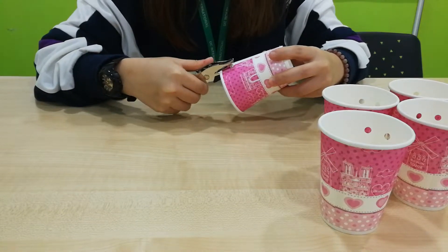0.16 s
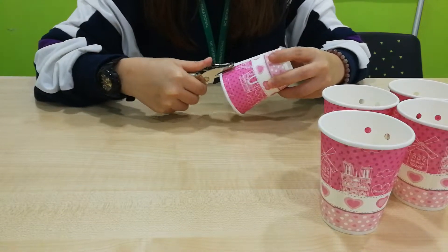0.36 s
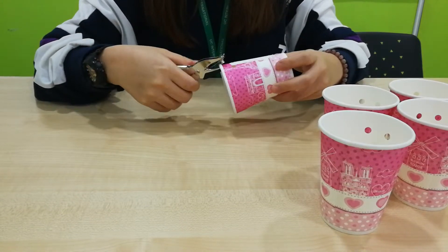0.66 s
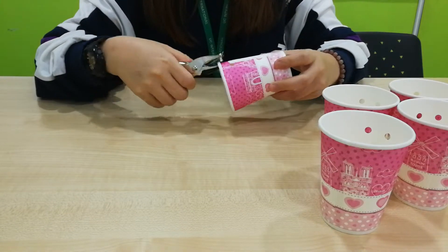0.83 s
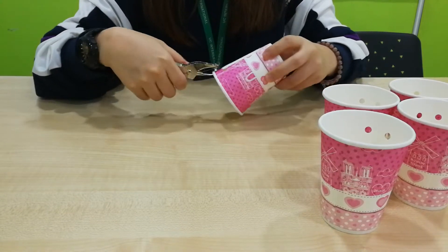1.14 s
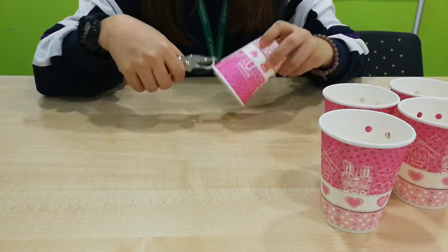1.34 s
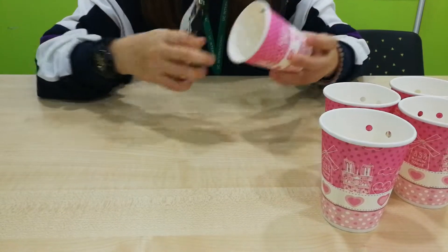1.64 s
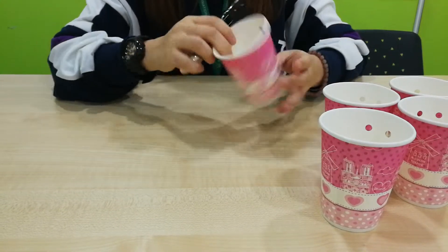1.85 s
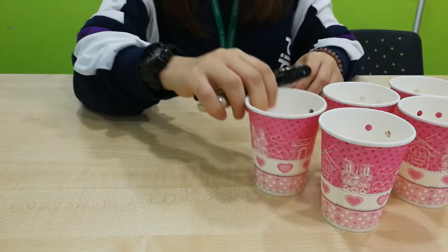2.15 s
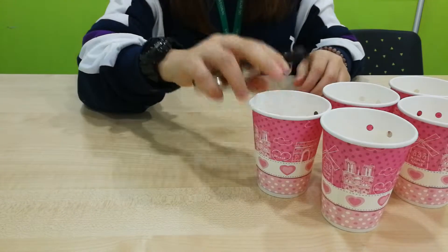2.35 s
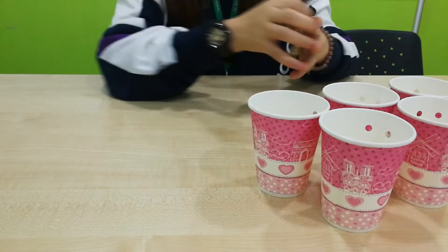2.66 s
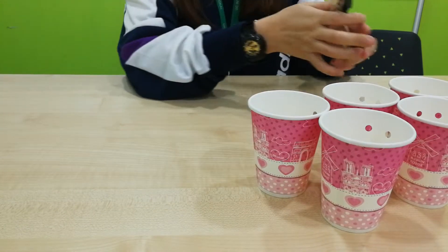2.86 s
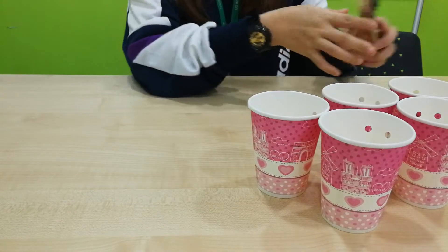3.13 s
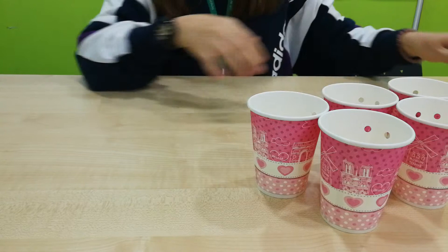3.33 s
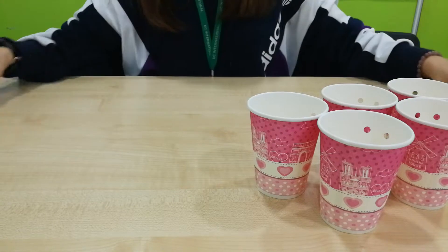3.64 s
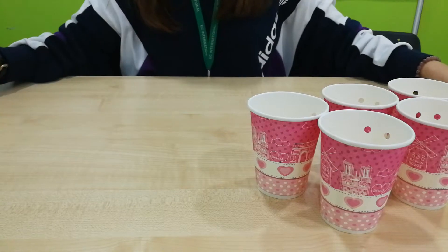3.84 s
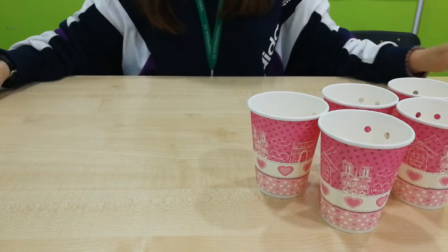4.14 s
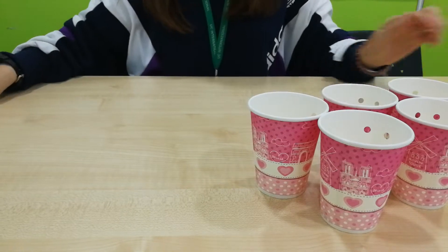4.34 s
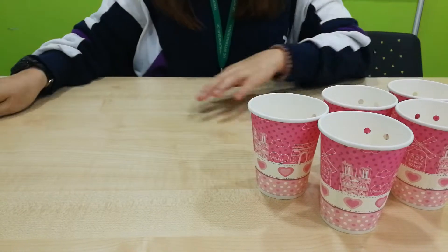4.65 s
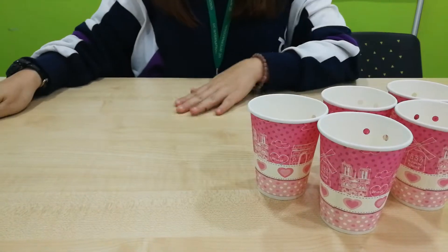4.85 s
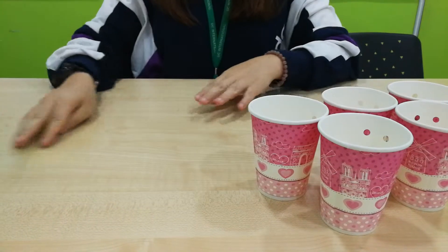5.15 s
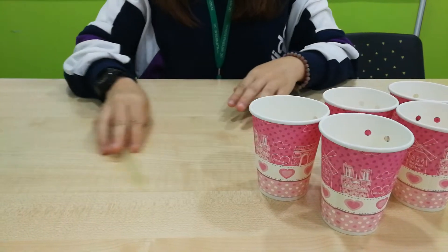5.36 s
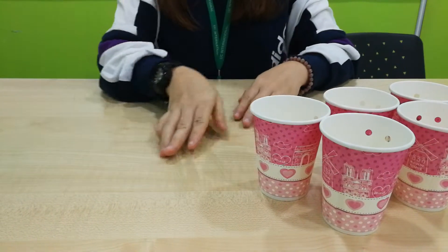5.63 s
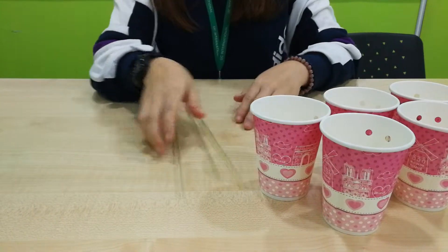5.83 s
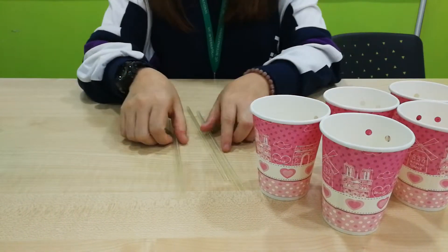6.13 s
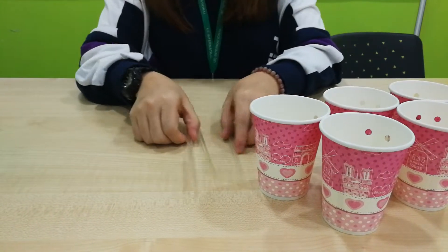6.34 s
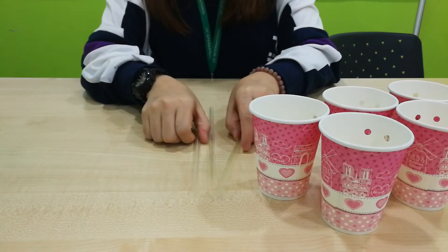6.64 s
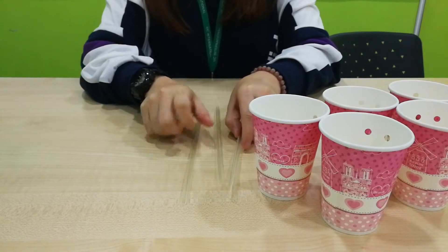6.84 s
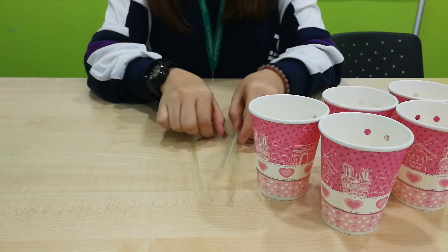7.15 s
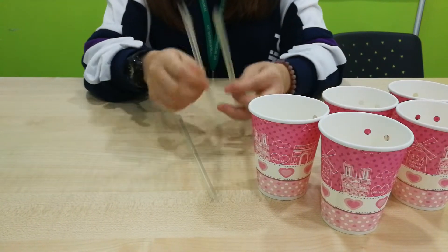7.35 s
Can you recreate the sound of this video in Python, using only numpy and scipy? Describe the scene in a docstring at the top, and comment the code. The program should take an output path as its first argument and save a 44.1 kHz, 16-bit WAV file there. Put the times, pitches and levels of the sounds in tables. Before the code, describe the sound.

A small hard-walled room, heard close from a phone with two microphones, with constant low air-conditioning rumble and soft hiss. Around 0.2 seconds faint metallic ticks lead to a loud, crisp hole-punch snap through a paper cup at 0.3, with smaller clicks and papery rubs at 0.5 to 0.7. Very faint cup taps and rubs follow from 1.0, ending in a clearer hollow tap at 1.8. At 2.2 the cup lands on the table with a firm, dull knock, and settles with a lighter one at 2.4. After a quiet gap, the punch is laid down at 3.7: two hard knocks almost together, the loudest moment, with a woody boom and short reverberation. From 4.2 light plastic straws click and scrape; the strongest swish comes at about 5.05, with smaller brushes until 5.8. Only faint touches and thin rustles remain up to 7.4.

```python
"""Two spaced phone microphones in a small hard room: a hand punch bites through a paper cup, close by.
The cup is tapped and set on a table, then the punch is laid down, jaws first and then handles.
Plastic straws are picked up, swept over the table top and nudged. Blows ring damped modes and slides
are dense stick-slip ticks; the room, an echo and a noise tail, answers both.
Throughout, air conditioning rumbles and hisses behind as shaped noise."""
import sys
import numpy as np
from scipy import signal
from scipy.fft import rfft, irfft, next_fast_len
from scipy.io import wavfile
from scipy.ndimage import uniform_filter1d

SR = 44100
rng = np.random.default_rng(int(sys.argv[2]) if len(sys.argv) > 2 else 0)


def unload_audio(sound):
    """Save the sound as a 16-bit wav file, at the path given as the first command line argument."""
    columns = np.transpose(np.atleast_2d(sound))
    # keep every value between -1 and 1, then stretch to whole-number steps
    steps = np.round(np.clip(columns, -1, 1) * 32767)
    wavfile.write(sys.argv[1], SR, steps.astype(np.int16))


N = 330309  # samples in the scene
SPAN = next_fast_len(N, True)  # samples of noise shaped at once

# Resonances of the punch in the cup and of the straws. Each row: centre in Hz, width in Hz, level in dB.
PUNCH_MODES = [(669, 80, 6), (1070, 97, 2.5), (1250, 450, -5), (2275, 290, -6), (2724, 390, 0),
               (4220, 1160, -6.5), (5140, 730, -12), (6870, 1240, -10.5), (9000, 1700, -18.5),
               (12400, 2700, -24)]
STRAW_MODES = [(1544, 600, -7.5), (2290, 360, -7.5), (2900, 720, -3.5), (3680, 390, -6.5), (4390, 800, -3),
               (5360, 2200, -11), (7800, 6200, -17.5), (11700, 4600, -20.5), (14100, 2700, -26)]
# Where a blow's colour is set, for punch and cup: low, reference, upper middle and high frequency in Hz.
CUP_BANDS = (560, 1000, 2800, 6000)


def punch_bites():
    """The punch bites through the cup: short hard contacts ring its resonances."""
    # Each row: start in seconds, peak in dB before the phone's colour, lows in dB, highs in dB, contact in ms.
    bites = [(.175, -31, -2, 15, 6.4), (.1795, -18, -3, 11.5, 5), (.185, -20.5, 5, 11, 4.1),
             (.2778, -2.5, -4, 1.5, 2.35), (.4965, -20, 7, 9, 3.4), (.589, -23, 1.5, -9.5, 7.1)]
    return blows(bites, PUNCH_MODES, CUP_BANDS, "hands", pan_db=0.0, room_db=10.5, mids_share=0.73)


def cup_taps():
    """Taps on the cup ring the resonances of its paper wall."""
    # Each row: start in seconds, peak in dB before the phone's colour, lows in dB, highs in dB, contact in ms.
    taps = [(.4845, -20, -14.5, 4.5, 2.9), (.572, -31.5, -1, -3, 3), (.6676, -19, -22, -9.5, 0.73),
            (1.0665, -37.5, -7, -14.5, 2.5), (1.281, -41, 6, 9, 1.6), (1.442, -34, -13, -11, 8.2),
            (1.464, -31, -7, 11, 3.4), (1.6566, -37, -7, 26, 1.3), (1.7005, -40.5, 6, 10, 6.6),
            (1.7744, -27.5, 4, 18.5, 10), (1.8045, -11.5, 9, 2.5, 3.2), (1.923, -33, -11, 7, 2.7)]
    # Each row: centre in Hz, width in Hz, level in dB.
    cup_modes = [(251, 98, -8), (382, 140, -5.5), (519, 137, 1), (729, 72, 5.5), (1111, 130, 3.5),
                 (1270, 150, -4.5), (1790, 210, -12), (2800, 1100, -16.5), (4500, 400, -15),
                 (6860, 2200, -22)]
    return blows(taps, cup_modes, CUP_BANDS, "hands", pan_db=1.5, room_db=10.0, mids_share=0.68)


def cup_set_down():
    """The cup lands on the table, whose top rings with a dull treble."""
    # Each row: start in seconds, peak in dB before the phone's colour, lows in dB, highs in dB, contact in ms.
    landings = [(2.2222, -7.5, -2.5, -3.5, 1.44), (2.238, -16, -4, -1, 2.8), (2.41, -36, -12, 19, 1.3),
                (2.4336, -16.5, -10.5, -6, 3.4)]
    # Each row: centre in Hz, width in Hz, level in dB.
    table_modes = [(560, 140, -9.5), (770, 130, -8), (1057, 114, -0.5), (1340, 220, -2), (1840, 280, -8),
                   (2610, 870, -8.5), (4300, 1100, -19.5), (6650, 910, -22.5), (8200, 2700, -26)]
    return blows(landings, table_modes, CUP_BANDS, "cups",
                 pan_db=0.0, room_db=9.0, mids_share=0.42, top_db=-11)


def punch_laid_down():
    """Jaws, then handles, strike the table; the handles set the whole table top booming."""
    # Each row: start in seconds, peak in dB before the phone's colour, lows in dB, highs in dB, contact in ms.
    touches = [(3.7306, -3, -15, -5.5, 7.6), (3.7553, -2.5, 0.9, 0, 2.3)]
    # Each row: centre in Hz, width in Hz, level in dB.
    tool_modes = [(197, 230, -5.5), (374, 550, -6.5), (1120, 1220, 5), (1800, 380, 4), (2640, 330, 2.5),
                  (3160, 720, 0.5), (4460, 920, -6), (6140, 720, -39), (8060, 410, -20)]
    # Low, reference, upper middle and high frequency in Hz.
    tool_bands = (704, 1520, 3200, 5500)
    jaws, handles = [
        blows([touch], tool_modes, tool_bands, "hands",
              pan_db=-2.5, room_db=room_db, mids_share=-1.5, top_db=-5)
        for touch, room_db in zip(touches, (9.5, 18.0))]
    return jaws + handles


def straw_clicks():
    """Light plastic straws click as contacts ring their high resonances."""
    # Each row: start in seconds, peak in dB before the phone's colour, lows in dB, highs in dB, contact in ms.
    clicks = [(4.2068, -32, -2, 8, 3.3), (4.3869, -37, -16, 1.5, 1.5), (4.4493, -29.5, -5.5, -2, 2.9),
              (4.6683, -18.5, 3, -14, 1.36), (4.7546, -17, 5.5, 5, 4.6), (4.7385, -33, 0, 3, 1.5),
              (4.8673, -34, -9, -5, 1.4), (5.1696, -26, -1, 15, 5.2), (5.2544, -27, 8, 8, 2.2),
              (5.5228, -28.5, 14, 0, 3.1), (5.7543, -29, 2, -2, 4.2), (5.7853, -33.5, 5, 0, 3.5),
              (6.2861, -38, 0, -11, 2.3), (6.8518, -26.5, 0, -5, 3.1), (7.1402, -36.5, -7, -2, 1.5),
              (7.201, -39, -8, 9, 1.6), (7.4011, -42, -7, 2, .9)]
    # Low, reference, upper middle and high frequency in Hz.
    straw_bands = (2410, 3100, 4530, 9000)
    return blows(clicks, STRAW_MODES, straw_bands, "straws", pan_db=-4.0, room_db=9.5, mids_share=.4)


def paper_rubs():
    """Paper slides by stick and slip, ringing the punch's resonances."""
    # Each row: firmest pressure in seconds, swell and fade over 20 dB in seconds, level of the lows in dB,
    # highs against lows in dB, left minus right in dB.
    strokes = [(.512, .015, 0.066, -44, -17, 8), (.586, 0.035, 0.047, -46.5, -12, 12),
               (1.46, 0.043, .08, -46.5, -12.5, 1.5), (1.71, 0.03, 0.2, -49.5, -21, 4),
               (1.808, .03, 0.1, -41, -15.5, 2)]
    return rub(strokes, PUNCH_MODES, slips_hz=6270, spread_db=2.5, flicker_db=2.0, low_hz=1430)


def straw_sweeps():
    """Straws sweep over the table top by stick and slip, ringing their own resonances."""
    # Each row: firmest pressure in seconds, swell and fade over 20 dB in seconds, level of the lows in dB,
    # highs against lows in dB, left minus right in dB.
    strokes = [(4.23, .03, 0.17, -51, -8, 3), (4.44, 0.12, .15, -53, -16, 1.2),
               (4.566, 0.064, 0.072, -45, -8.5, 1.5), (4.69, 0.068, 0.065, -46, -8.5, 3),
               (4.79, 0.059, 0.047, -44, -7, 0), (5.052, 0.076, .2, -32.5, -9, -1),
               (5.19, 0.068, 0.067, -48, -7, 5), (5.255, 0.029, .08, -47, -4, -.6),
               (5.33, .12, 0.15, -45.5, -9.5, .4), (5.44, 0.13, 0.12, -43, -11, 1),
               (5.52, 0.071, 0.12, -47, -6, 6.5), (5.66, 0.028, 0.054, -57, -11, -2),
               (6.14, 0.11, .2, -61, -20, -2), (6.32, 0.089, .2, -58, -9, 2),
               (6.41, 0.21, 0.14, -56.5, -4, 3), (6.48, 0.13, 0.04, -62.5, -6, 3),
               (7.12, .1, 0.13, -55, -11, 2), (7.2, .05, .3, -63.5, -7, 6),
               (7.405, .02, 0.088, -56.5, -9, 1.2)]
    return rub(strokes, STRAW_MODES, slips_hz=5930, spread_db=0.6, flicker_db=3.0, low_hz=1890)


def blows(events, modes, bands_hz, place, pan_db, room_db, mids_share, top_db=0, size=4096):
    """A sharp touch and ragged contact ring the modes: left, right, and what the walls hear per side."""
    # For each place, the samples by which the left microphone hears it first.
    left_lead = {"hands": 27, "cups": 6, "straws": 22}
    out = np.zeros((4, N + 2 * size))
    t = np.arange(size) / SR
    hz = np.fft.rfftfreq(size, 1 / SR)
    # heavy things stay in touch longer and lose the top
    ring = body(hz, modes) * undb(along(hz, [(8000, 0), (13000, top_db)]))
    sides_db = np.array([[pan_db], [-pan_db]]) / 2
    for s, peak_db, low_db, high_db, ms in events:
        contact = rng.standard_normal((3, size)) * np.exp(-t / (max(ms, .1) / 1000))
        # each microphone sees the thing from another side
        contact[1] = .8 * contact[0] + .6 * contact[1]
        # the walls hear all sides at once, which evens the raggedness out
        contact[2, 1:] = 0
        contact[:, 0] = 2.7  # the sharp first touch
        colour_db = (low_db, 0, mids_share * high_db, high_db)
        colour = undb(along(hz, list(zip(bands_hz, colour_db))))
        hit = irfft(rfft(contact) * causal(ring * colour))
        hit[:2] *= undb(peak_db + sides_db) / np.abs(hit[:2]).max(axis=1, keepdims=True)
        hit[2] *= undb(peak_db + room_db) / np.sqrt(np.sum(hit[2] ** 2))
        i = int(s * SR)
        out[0, i:i + size] += hit[0]
        out[1, i:i + size] += np.roll(hit[1], left_lead[place])
        out[2:, i:i + size] += hit[2] * undb(0.32 * sides_db)  # the walls hear less of the pan
    return out[:, :N]


def rub(strokes, modes, slips_hz, spread_db, flicker_db, low_hz):
    """Dense uneven stick-slip ticks ring the modes, with a finer scratch on top; strokes swell and fade."""
    t = np.arange(N) / SR
    hz = np.fft.rfftfreq(SPAN, 1 / SR)
    slips = rng.random((2, SPAN)) < slips_hz / SR
    ticks = slips * rng.standard_normal((2, SPAN))
    ticks = ticks * undb(spread_db * rng.exponential(size=(2, SPAN)))
    # light contact barely moves the low modes
    light_touch = 1 / (1 + (low_hz / np.maximum(hz, 1)) ** 4)
    spectrum = rfft(ticks) * body(hz, modes) * light_touch
    scratch_share = 1 / (1 + (7000 / np.maximum(hz, 1)) ** 6)
    lows = unit(irfft(spectrum * (1 - scratch_share), SPAN)[:, :N])
    highs = unit(irfft(spectrum * scratch_share, SPAN)[:, :N])
    lows = lows * undb(flicker_db * walk(45))
    highs = highs * undb(flicker_db * walk(45))
    out = np.zeros((2, N))
    for s, swell_s, fade_s, level_db, high_db, pan_db in strokes:
        pressure = undb(-20 * np.maximum((s - t) / max(swell_s, .005), (t - s) / max(fade_s, .005)))
        sides_db = np.array([[pan_db], [-pan_db]]) / 2
        out += pressure * undb(level_db + sides_db) * (lows + undb(high_db) * highs)
    return np.vstack([out, undb(-6.5) * out])  # the walls' share is weaker


def room(send):
    """A smeared echo from the near wall and a diffuse tail, short at the very top, that steepens."""
    # Each row: frequency in Hz, time to fall by 60 dB in seconds.
    room_t60 = [(150, 0.67), (500, 0.74), (1500, 0.81), (4000, 0.73), (8000, 0.91), (14000, 0.24)]
    tail_db, build_s, bend = -2, 0.0025, 1.18
    echo_s, echo_db, echo_ms = .0155, -10, 2.8
    t = np.arange(SR) / SR
    hz = np.fft.rfftfreq(SR, 1 / SR)
    tail = np.zeros((2, SR))
    noise = pair(hz, SR)
    for centre_hz in 100 * 2 ** np.arange(0, 7.6, .5):
        band = np.clip(1 - 2 * np.abs(np.log2(np.maximum(hz, 1) / centre_hz)), 0, 1)
        decay = undb(-60 * (t / along(centre_hz, room_t60)) ** bend)
        tail += irfft(noise * band, SR) * decay
    tail *= 1 - np.exp(-t / build_s)
    tail *= undb(tail_db) / np.sqrt(np.sum(tail ** 2) / 2)
    echo_shape = (t > echo_s) * np.exp(-np.abs(t - echo_s) / (echo_ms / 1000))
    scatter = rng.standard_normal((2, SR)) * echo_shape
    tail += undb(echo_db) * scatter / np.sqrt(np.sum(scatter ** 2) / 2)
    return signal.fftconvolve(send, tail, axes=1)[:, :N]


def air():
    """Air conditioning: broad rumble and hiss of shaped noise with a few wavering humps."""
    # Spectrum of the broad noise. Each row: frequency in Hz, relative density in dB per Hz.
    air_colour = [(12, -40), (20, -3.5), (63, -18.5), (120, -4.5), (255, -10.5), (285, -10), (410, -24),
                  (849, -15.5), (1260, -18.5), (1370, -22.5), (2600, -20.5), (6010, -24), (6720, -33),
                  (7520, -30.5), (16000, -43)]
    # Narrow humps. Each row: centre in Hz, width in Hz, rms level in dB about which it wavers.
    humps = [(47, 13, -66), (85.6, 12, -64.5), (121.9, 18, -59), (200.3, 27, -69), (867.4, 38, -63),
             (6700, 240, -64.5)]
    hz = np.fft.rfftfreq(SPAN, 1 / SR)
    broad = irfft(pair(hz, SPAN) * undb(along(hz, air_colour)), SPAN)[:, :N]
    out = undb(-53 + 0.63 * walk(2.4)) * unit(broad)
    for f, w, db in humps:
        hump = irfft(pair(hz, SPAN) / (1 + (2 * (hz - f) / w) ** 2), SPAN)[:, :N]
        out += undb(db + 0.53 * walk(4)) * unit(hump)
    return out


def pair(hz, size):
    """Spectra of a left and a right noise, alike in the bass and opposed or unrelated higher up."""
    # Each row: frequency in Hz, likeness of left and right from -1 to 1.
    likeness = [(60, .99), (150, 1), (290, 0.87), (640, -0.52), (1400, 0.0063)]
    like = np.clip(along(hz, likeness), -1, 1)
    mid, side = rfft(rng.standard_normal((2, size))) * np.sqrt([1 + like, 1 - like])
    return np.array([mid + side, mid - side])


def body(hz, modes):
    """Gain of damped resonances, summed as powers so that no holes fall between them."""
    power = 0
    for f, w, db in modes:
        detuning = (f ** 2 - hz ** 2) / (np.maximum(hz, 1) * w)
        power = power + undb(2 * db) / (1 + detuning ** 2) ** 1.59
    return np.sqrt(power)


def causal(gain):
    """The minimum-phase spectrum with this gain, which rings only after the blow."""
    cepstrum = irfft(np.log(gain + 1e-9))
    half = cepstrum.shape[-1] // 2
    cepstrum[..., 1:half] *= 2
    cepstrum[..., half + 1:] = 0
    return np.exp(rfft(cepstrum))


def lean(x, balance, size=512):
    """Tilt a stereo sound by a (Hz, left minus right dB) table, half on each side."""
    db = along(np.fft.rfftfreq(size, 1 / SR), balance)
    tilt = irfft(causal(undb(np.array([db, -db]) / 2)))
    return signal.fftconvolve(x, tilt, axes=1)[:, :N]


def walk(rate):
    """Random levels, one per 1 / rate seconds, joined by straight slopes; spread near 1."""
    k = int(SR / rate)
    held = np.repeat(rng.standard_normal(N // k + 1), k)
    return 1.2 * uniform_filter1d(held, k)[:N]


def undb(db):
    """Amplitude factor of a level in dB."""
    return 10 ** (np.asarray(db) / 20)


def along(hz, table):
    """Read a (Hz, value) table on a log-frequency axis."""
    f, v = np.transpose(table)
    return np.interp(np.log(np.maximum(hz, 1)), np.log(f), v)


def unit(x):
    """Scale a sound to an rms of 1."""
    return x / np.sqrt(np.mean(x ** 2))


def scene():
    """Handling sounds in the phone's shadow, the room's answer, and the air conditioning behind."""
    # The phone's shadow on sound from the front. Each row: frequency in Hz, left minus right in dB.
    shadow = [(150, 3.5), (500, 2.5), (1100, 7), (2000, 2.5), (5000, -5.5), (8000, 12), (13000, 3.5)]
    near = punch_bites()
    near += cup_taps()
    near += cup_set_down()
    near += punch_laid_down()
    near += straw_clicks()
    near += paper_rubs()
    near += straw_sweeps()
    direct, to_walls = near[:2], near[2:]
    return lean(direct, shadow) + room(to_walls) + air()


def record(dry):
    """Two unlike microphones; the phone rounds the loudest peaks and cuts the top."""
    # The microphones' own colours. Each row: frequency in Hz, left minus right in dB.
    mic_balance = [(500, 0), (1500, 2), (2200, -3), (3200, -8), (6000, -4.5), (8500, 0.5), (13000, 8.5)]
    heard = lean(dry, mic_balance)
    rounded = heard / (1 + heard ** 4) ** .25
    top_cut = signal.ellip(10, .2, 75, 16000, fs=SR, output="sos")  # low-pass at 16 kHz
    return .93 * signal.sosfilt(top_cut, rounded)


dry = scene()
out = record(dry)
unload_audio(out)
```